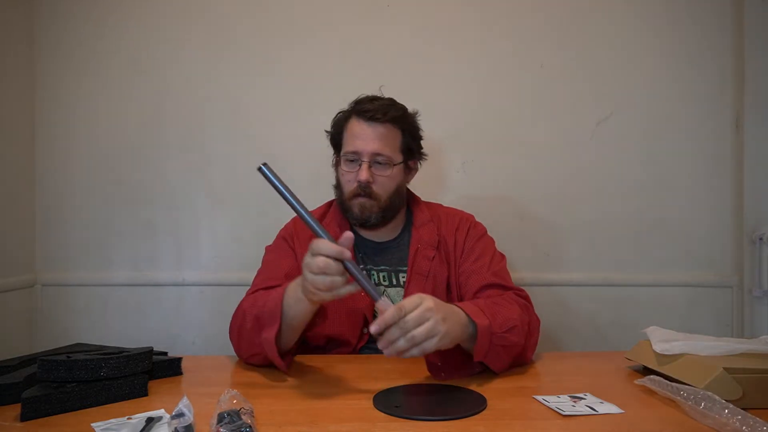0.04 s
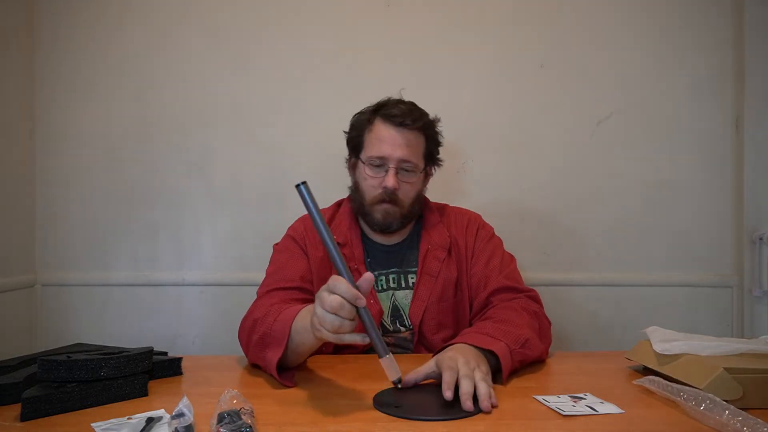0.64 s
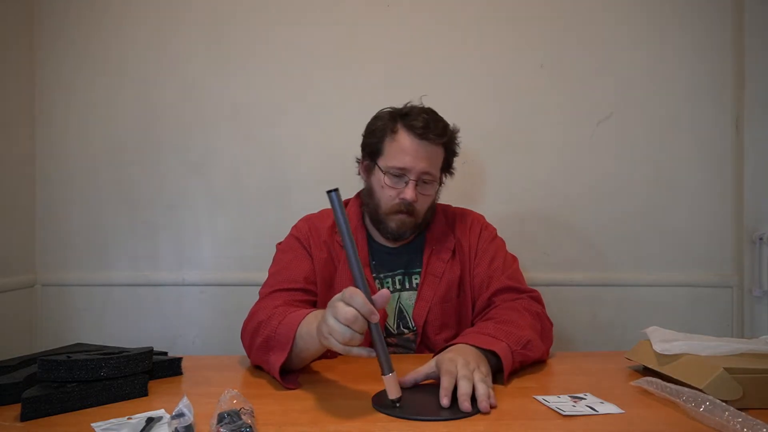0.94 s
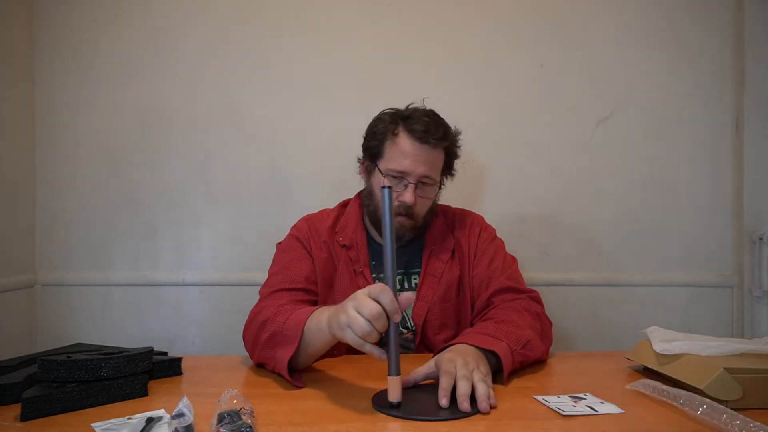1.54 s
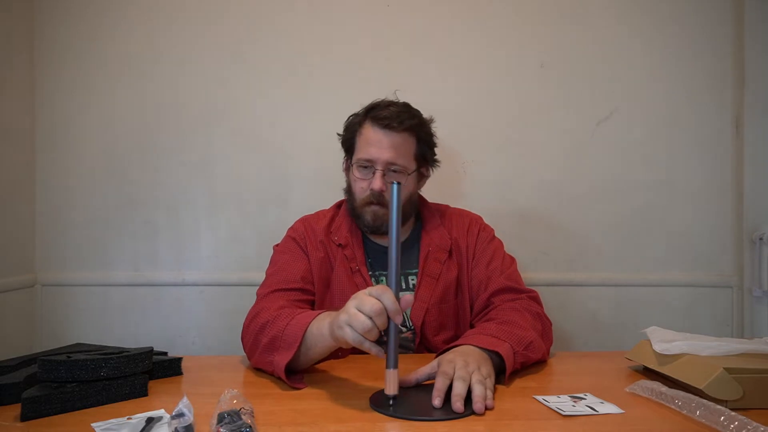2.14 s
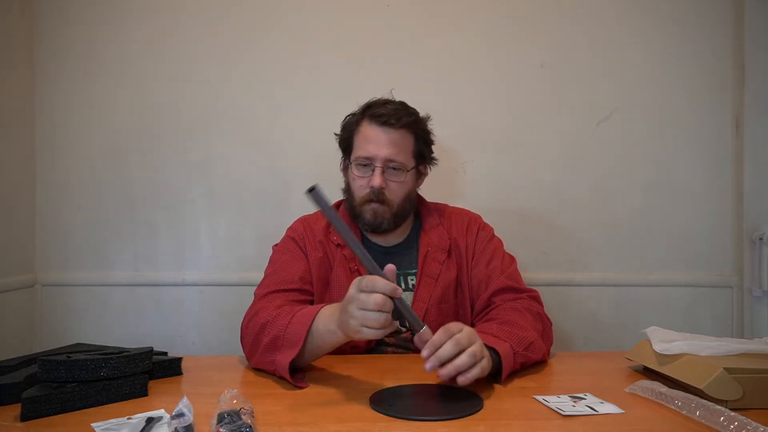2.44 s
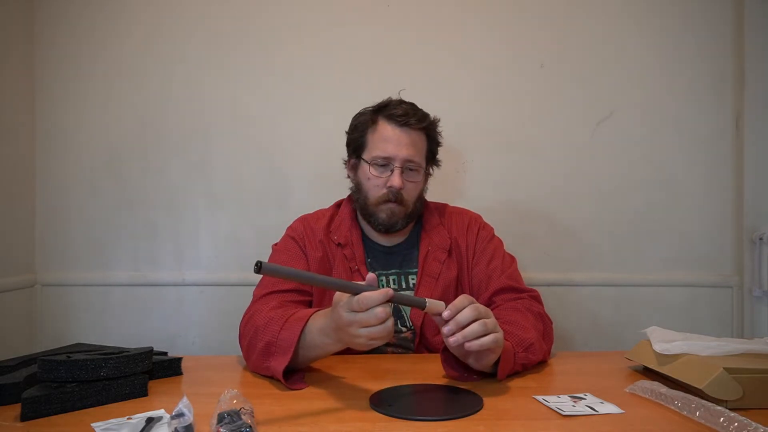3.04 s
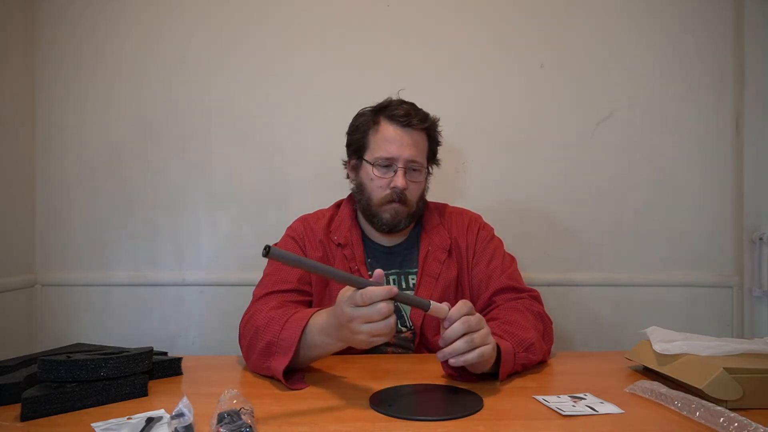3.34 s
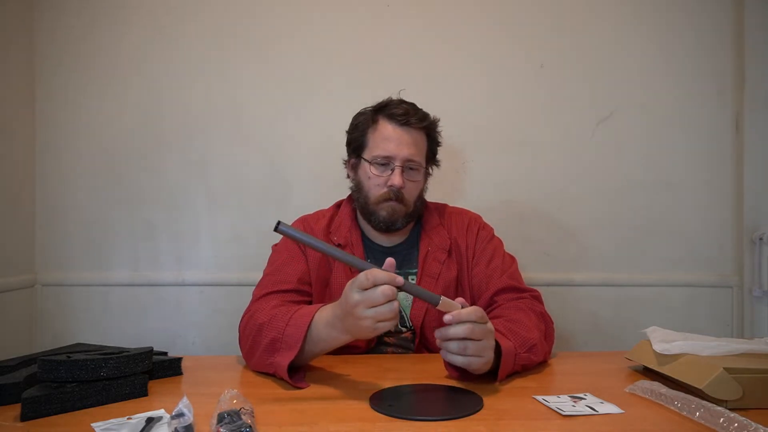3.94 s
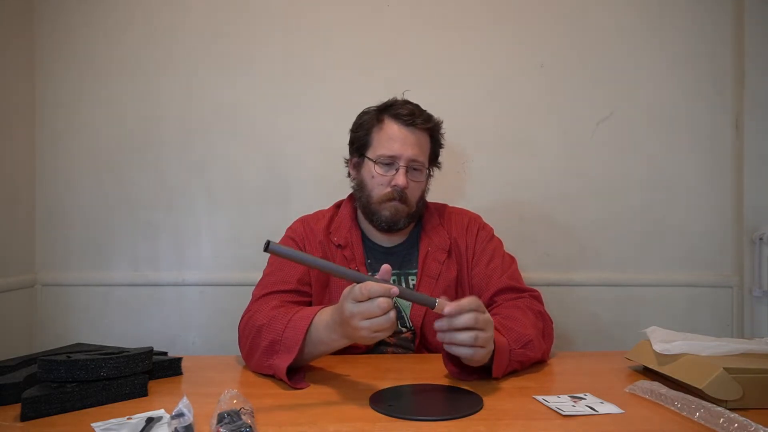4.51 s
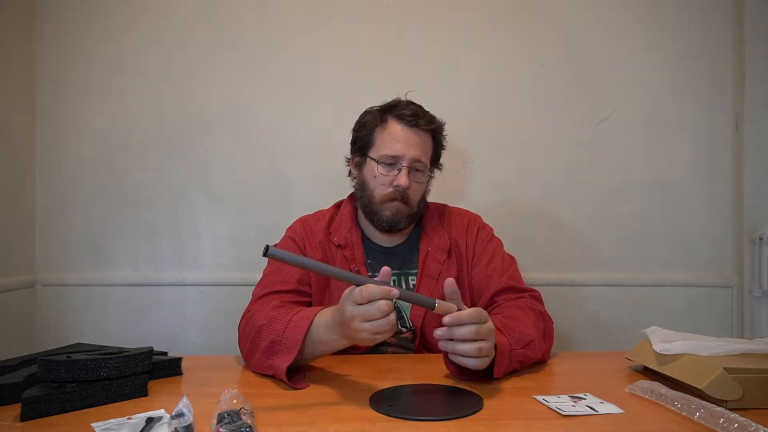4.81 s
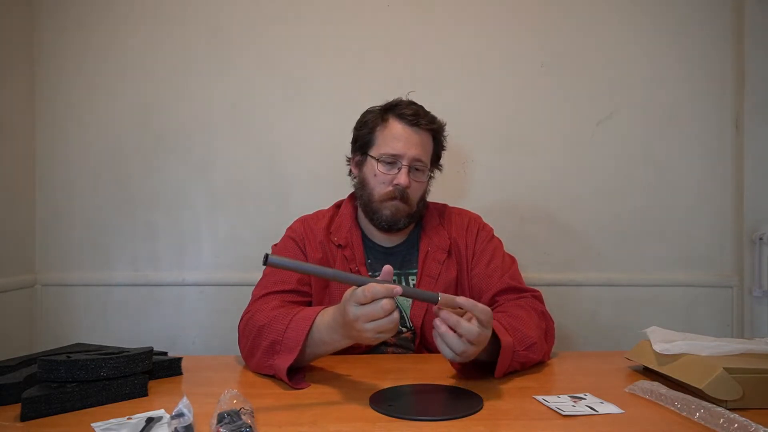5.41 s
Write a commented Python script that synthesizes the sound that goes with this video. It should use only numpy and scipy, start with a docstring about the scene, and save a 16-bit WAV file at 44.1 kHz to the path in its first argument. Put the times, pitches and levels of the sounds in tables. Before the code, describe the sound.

A metal pole knocks on its round base on a wooden table, then a fitting is twisted, scraped and clinked in the tube.

```python
"""A steel stand pole is tried on its round base on a wooden table, in a small bare room.
Its knocks excite the modes of the base, which booms through the table top. A fitting in the
pole's end is rubbed, twisted and clinked against the hand-held tube: impact and friction
drive the same damped resonances. Palms and sleeves brush, fingers tick, and the room hums low."""
import sys
import numpy as np
from scipy import signal
from scipy.fft import rfft, irfft, next_fast_len
from scipy.io import wavfile
from scipy.ndimage import map_coordinates

SR = 44100
rng = np.random.default_rng(int(sys.argv[2]) if len(sys.argv) > 2 else 0)


def wrap_up_sound(samples):
    """Save the sound to the file named by the first command line argument, as 16-bit audio."""
    columns = np.atleast_2d(samples).T
    # keep every value between -1 and 1, then stretch to whole-number steps
    tamed = np.clip(columns, -1, 1)
    steps = np.round(tamed * 32767).astype(np.int16)
    wavfile.write(sys.argv[1], SR, steps)


N = 245632

# modes of the hand-damped steel tube: f/Hz, level/dB, T60/s
TUBE_MODES = [(1980, -28, 0.13), (2963, -8, 0.079), (3185, -16.5, 0.16), (3375, -18.5, 0.16),
              (4155, -11, 0.18), (4340, -5, 0.044), (4680, -13.5, 0.036), (5350, -13.5, 0.19),
              (5540, -3, 0.089), (5586, -13, 0.25), (6900, -11, 0.026), (7550, -14.5, 0.081),
              (8640, -10.5, 0.061), (8420, -8.5, .05), (9910, -8.5, 0.023), (10900, -9.5, .065),
              (10870, -10.5, .17), (11300, -7, .045), (13120, -17, 0.13), (13300, -12, 0.031),
              (15200, -15, .09)]


def amp(db):
    """Amplitude ratio of a level in decibels."""
    return 10 ** (np.asarray(db) / 20)


def unit(x):
    """Normalisation to rms 1."""
    return x / np.sqrt(np.mean(x ** 2) + 1e-20)


def along(points, hz):
    """Interpolation of (f/Hz, value) points on a logarithmic frequency axis."""
    f, v = np.transpose(points)
    return np.interp(np.log(hz + 1), np.log(f + 1), v)


def wobble(rate):
    """Smooth random modulation: a spline through rate knots a second."""
    return map_coordinates(rng.standard_normal(int(N * rate / SR) + 4), [np.arange(N) * rate / SR])


def filtered(x, response):
    """Linear filtering: the spectrum of x times a frequency response."""
    n = x.shape[-1]
    m = next_fast_len(n + 4096)
    return irfft(rfft(x, m) * response(np.fft.rfftfreq(m, 1 / SR)), m)[..., :n]


def noise(spectrum, shape):
    """Gaussian noise of rms 1, coloured by (f/Hz, level/dB) points."""
    return unit(filtered(rng.standard_normal(shape), lambda hz: amp(along(spectrum, hz))))


def spread(pair, side_db):
    """Sum and difference of two unrelated signals give partly coherent left and right channels."""
    side = amp(side_db) * pair[1]
    return np.array([pair[0] + side, pair[0] - side]) / np.hypot(1, amp(side_db))


def add(track, s, sound):
    """Superposition of a sound on the track, starting at s seconds."""
    start = max(round(s * SR), 0)
    part = track[..., start:start + sound.shape[-1]]
    part += sound[..., :part.shape[-1]]


def swells(rows, rest_db, attack_s, release_s, sag_db_per_s=0):
    """Envelope of gestures added in power to a resting level; attack and release span 60 dB."""
    start, length, db = np.transpose(rows)[..., None]
    t = np.arange(N) / SR - start
    level = db - 60 * np.maximum(-t, 0) / attack_s - sag_db_per_s * np.clip(t, 0, length)
    level -= 60 * np.maximum(t - length, 0) / release_s
    return np.sqrt(amp(rest_db) ** 2 + np.sum(amp(np.maximum(level, -200)) ** 2, axis=0))


def ring(modes, t, scatter_db, detune):
    """Free vibration: damped modes of alternating sign, perturbed by the grip at each blow."""
    hz, db, t60 = np.transpose(modes)[..., None]
    level = db + scatter_db * rng.standard_normal(db.shape)
    hz = hz * (1 + detune * rng.standard_normal(db.shape))
    sign = (-1) ** np.arange(len(modes))[:, None]
    return np.sum(sign * amp(level - 60 * t / t60) * np.sin(2 * np.pi * hz * t), axis=0)


def in_room(x, wet_db, early_db=-11, early_t60=0.067, side_db=-2):
    """Reverberation: direct sound, early reflections from table and wall, and a diffuse tail."""
    # reverberation time of the room: f/Hz, T60/s
    walls = [(100, 0.45), (300, 0.41), (1000, 0.43), (3000, 0.44), (7000, 0.3), (15000, 0.19)]
    hz, t, z = signal.stft(rng.standard_normal((2, SR // 2)), SR, nperseg=256)
    tail = signal.istft(z * amp(-60 * t / along(walls, hz)[:, None]), SR, nperseg=256)[1]
    t = np.arange(tail.shape[1]) / SR
    tail *= 1 - np.exp(-t / 0.0043)
    early = rng.standard_normal(tail.shape) ** 3 * amp(-60 * t / early_t60) * (1 - np.exp(-t / 0.012))
    response = spread(amp(wet_db) * unit(tail) + amp(early_db) * unit(early), side_db) / np.sqrt(len(t))
    return x + signal.fftconvolve(x[None], response, axes=1)[:, :len(x)]


def room_tone():
    """Background noise: still air and rumble under low tones modulated in amplitude and phase."""
    # spectrum of still air: f/Hz, level/dB
    air_spectrum = [(12, -29), (20, -5.5), (65, 0), (138, -4), (222, -2), (377, -7.5), (430, -11),
                    (560, -14.5), (1100, -21), (2000, -33), (4700, -38), (7500, -34), (16000, -46.5)]
    # partials of the hum: f/Hz, level/dB
    partials = [(210, -68), (296, -70.5), (415, -70.5)]
    # swells of the drone and of the rumble: t/s, duration/s, level/dB
    drone_swells = [(0, 0.071, -59.5), (3.34, 0.3, -55.5), (4.08, 0.16, -61.5)]
    rumble_swells = [(0, .03, -54), (.24, 0.063, -56.5), (4.91, 0.079, -53), (5.15, 0.27, -57.5)]
    rumble_spectrum = [(10, -15), (25, 3), (45, -3), (70, -19.5), (200, -63.5), (1000, -120)]
    t = np.arange(N) / SR
    tone = lambda hz, waver: np.sqrt(2) * np.sin(2 * np.pi * hz * t + waver * wobble(6.1))
    slow_swells = lambda rows, rest_db: swells(rows, rest_db, attack_s=0.26, release_s=0.56)
    hum = sum(amp(db + 1.9 * wobble(4.4)) * tone(hz, waver=0.77) for hz, db in partials)
    drone = slow_swells(drone_swells, rest_db=-65) * amp(1.6 * wobble(5)) * tone(hz=87, waver=0.87)
    rumble = slow_swells(rumble_swells, rest_db=-62) * spread(noise(rumble_spectrum, (2, N)), -2.5)
    air = amp(-57.5) * spread(noise(air_spectrum, (2, N)), side_db=-2.5)
    return air + hum + drone + rumble


def sliding_palm(log_width=0.48, skirt_db=-9):
    """Friction noise of a palm on the pole: the band falls in frequency as the hand slows."""
    # course of the slide: t/s, relative level/dB, centre f/Hz
    slide = [(0, -64.5, 4800), (.1, -77, 4200), (.18, -60, 3100), (.26, -57, 2400), (.34, -63.5, 2100),
             (.45, -87, 2000), (.7, -95, 2000)]
    times, db, centre = np.transpose(slide)
    hz, t, z = signal.stft(rng.standard_normal(N), SR, nperseg=256)
    offset = np.log((hz[:, None] + 1) / np.interp(t, times, centre))
    band = np.exp(-(offset / log_width) ** 2) + amp(skirt_db - 3.6 * np.abs(offset))
    hiss = signal.istft(z * band, SR, nperseg=256)[1][:N]
    level = np.interp(np.arange(N) / SR, times, db)
    return in_room(amp(level - 2) * unit(hiss), wet_db=-8)


def fitting_db(hz):
    """Resonance of the short steel fitting: broad Lorentzian peaks, as a boost in dB."""
    # resonances: f/Hz, width/Hz, boost/dB
    peaks = [(4400, 250, 3), (5544, 410, 6.5), (6670, 410, 5), (7620, 130, 9), (8640, 290, 9.5),
             (10000, 220, 7.5), (11100, 180, 7.5), (11600, 210, 3), (13030, 280, 5.5)]
    return sum(db / (1 + (2 * (hz - centre) / width) ** 2) for centre, width, db in peaks)


def clinks(graze_s=.003, graze_db=-15, spot_db=6.5, spot_log_width=0.079):
    """Impact excitation: steel grazes, catches and chatters, leaving the tube in free vibration."""
    # impacts, in relative levels: t/s, level/dB, body/dB, sparkle/dB, favoured f/Hz, tube ring/dB
    impacts = [(0.0705, -27, -11.5, -19, 5400, 4), (1.1208, -29, -1.5, -12, 5430, 7),
               (1.1499, -20, -5.5, -12.5, 5480, -1.5), (1.226, -23.5, -2, -30, 1600, 0),
               (1.701, -35, 0.5, -16, 5450, 1.5), (2.3672, -17, -21, -10, 6940, -12),
               (2.3714, -22.5, -16, -10.5, 4400, -3.5), (2.4115, -15, -19.5, -10.5, 7090, -11),
               (2.5666, -36.5, -15.5, -18, 4900, -8.5), (2.6002, -13, -24, -11, 8650, -2),
               (2.7988, -38.5, -4.5, -9, 2400, -10), (3.1476, -41.5, -15, -24, 4200, 3),
               (3.2041, -29, -16.5, -10, 8800, -8), (3.8445, -36.5, -11, -18.5, 4880, -1),
               (3.9101, -37, -11, -15, 5300, -2), (3.926, -37.5, -10.5, -22, 5140, -2),
               (4.0927, -26, -17, -21.5, 3430, 5.5), (4.2294, -35, -16, -18, 3400, 2.5),
               (4.2348, -31.5, -13, -24, 4200, -0.5), (4.3849, -32, -15.5, -29, 4400, -2),
               (4.3879, -22, -21, -22, 4500, 1.5), (4.4549, -9.5, -25.5, -10, 7560, -5.5),
               (4.5151, -17, -26, -9, 6730, -3), (4.539, -26.5, -14, -18.5, 4200, 0),
               (4.8293, -19, -20, -15, 4480, -5), (4.8422, -19, -15.5, -19, 5350, 7),
               (4.8477, -12, -18.5, -16.5, 5510, 0.5), (4.8722, -14.5, -29, -5.5, 4170, 2),
               (5.228, -35.5, -12, -13, 3420, 1), (5.2535, -19.5, -24, -17, 5840, -11),
               (5.2588, -18.5, -19.5, -12, 4260, -4)]
    # spectrum of the contact noise: f/Hz, level/dB
    contact_spectrum = [(150, -41.5), (500, -23), (900, -13), (2200, -7.5), (3000, 3.5), (5500, -0.5),
                        (8500, -3.5), (9400, -9), (12000, -3), (13200, -9), (14000, -20), (15200, -10.5),
                        (16000, -23)]
    loose_to_firm_db = [-19, -2]  # a firm grip gives more body, shorter chatter, shallower resonances
    out, t = np.zeros((2, N)), np.arange(SR // 2) / SR
    after = np.maximum(t - graze_s, 0)
    attack = np.maximum(amp(graze_db) * np.minimum(t / graze_s, 1), 1 - np.exp(-after / 0.00031))
    for s, db, body_db, sparkle_db, spot_hz, ring_db in impacts:
        chatter_t60 = np.interp(body_db, loose_to_firm_db, [.025, .014])
        depth = np.interp(body_db, loose_to_firm_db, [1.4, .32])
        chatter = filtered(noise(contact_spectrum, len(t)), lambda hz: amp(depth * fitting_db(hz)))
        seating = amp(-60 * np.minimum(after / chatter_t60, 3) ** 1.39)  # holds, then the parts seat
        tube = amp(ring_db - 11) * ring(TUBE_MODES, after, scatter_db=1.5, detune=0.0011)
        hit = (unit(chatter) * seating + tube) * attack
        colour = [(2000, body_db + 16.5), (4200, 0.0025), (8000, 0.0028), (11500, sparkle_db + 13.5)]
        # the struck spot favours some modes
        spot = lambda hz: spot_db * np.exp(-(np.log((hz + 1) / spot_hz) / spot_log_width) ** 2)
        hit = filtered(hit, lambda hz: amp(along(colour, hz) + spot(hz)))
        hit /= np.std(hit[:SR // 140])  # the first 7 ms set the level
        add(out, s - graze_s, in_room(amp(db - 11.5) * hit, wet_db=-5.5))
    return out


def rubbing(grit_db=6, ring_db=6, width_hz=45):
    """Stick-slip friction: rough steel drives the tube, whose least damped modes build up most."""
    # strokes of the fitting in the tube: t/s, duration/s, relative level/dB
    strokes = [(.072, 0.0064, -39), (1.78, 0.055, -65.5), (3.42, .26, -73), (3.935, 0.32, -53),
               (4.06, .025, -49), (4.092, .03, -44.5), (4.205, .035, -46), (4.46, 0.03, -34.5),
               (4.53, 0.16, -44.5), (4.85, 0.063, -34), (5.262, 0.011, -34.5), (5.34, .015, -50)]
    colour = [(300, -28), (1200, -9), (2000, -8.5), (3300, 0.5), (4200, -5), (5500, -10),
              (9000, -14), (12000, -11), (15000, -15), (16000, -24)]  # f/Hz, level/dB
    slips = rng.standard_normal(N) * unit(amp(grit_db * wobble(500) + 2.8 * wobble(60)))
    contact = lambda f: amp(along(colour, f) + fitting_db(f))
    tube = lambda f: sum(t60 / 0.11 * 1j * f * width_hz / (hz * hz - f * f + 1j * f * width_hz)
                         for hz, _, t60 in TUBE_MODES)
    scrape = filtered(slips, lambda f: contact(f) * (1 + amp(ring_db) * tube(f)))
    # the fitting never lies quite still
    envelope = swells(strokes, rest_db=-82.5, attack_s=0.033, release_s=0.19, sag_db_per_s=33.5)
    return in_room(amp(-5.5) * envelope * unit(scrape), wet_db=-5.5)


def sleeves():
    """Soft friction: cloth and skin give fluctuating broadband noise as the arms move."""
    # arm movements: t/s, duration/s, relative level/dB
    movements = [(.15, 0.1, -56.5), (.44, 0.24, -64.5), (2.3, .42, -68.5), (3.7, 0.05, -70)]
    # spectrum of brushing cloth: f/Hz, level/dB
    cloth_spectrum = [(150, -16.5), (400, -1), (1200, -0.5), (2600, -3), (5000, -8), (10000, -13.5),
                      (16000, -16)]
    brush = unit(noise(cloth_spectrum, N) * amp(4.4 * wobble(60)))
    envelope = swells(movements, rest_db=-71, attack_s=.5, release_s=0.71)
    return in_room(amp(-4) * envelope * brush, wet_db=-3.5)


def knocks(settle_s=0.0398, settled_db=-7):
    """Structure-borne sound: the struck base shudders and settles; the table's lowest mode booms on."""
    # blows on the base: t/s, level/dB, cut-off f/Hz, relative boom/dB
    blows = [(.238, -54, 1700, -5), (.381, -49, 1400, -9), (0.9537, -30, 1280, -6.5),
             (1.144, -28, 1830, -12), (1.2241, -25, 2150, -9.5), (1.614, -36, 395, -15),
             (1.698, -47, 680, -12.5), (1.757, -47, 380, -14.5)]
    # modes of the base on the table, the table's own first: f/Hz, level/dB, T60/s
    modes = [(130.2, 0, 1), (177.5, -6.5, 0.177), (223.5, -9.5, 0.16), (319.4, -2, 0.25),
             (356.2, -4.5, 0.43), (406.6, -15.5, 0.56), (483.4, -11, 0.18), (575, -4, 0.12),
             (592, -7.5, 0.22), (683, -11, 0.2), (846, -6.5, 0.18), (900, -6.5, 0.16), (1020, -16, 0.17),
             (1205, -12, 0.2), (1290, -9.5, 0.1), (1348, -9.5, 0.13), (1635, -28, 0.1), (1810, -28, 0.078)]
    # spectrum of the contact noise: f/Hz, level/dB
    thud_spectrum = [(60, -27), (170, -18), (350, 7.5), (900, 9.5), (1400, -0.5), (2200, -8.5),
                     (5000, -5.5)]
    out, t = np.zeros((2, N)), np.arange(SR) / SR
    shudder = amp(np.interp(t, [0, settle_s, settle_s + 0.0042], [-2, 2, settled_db]))
    table_hz, table_db, table_t60 = modes[0]
    boom = amp(table_db - 60 * t / table_t60) * np.sin(2 * np.pi * table_hz * t)
    boom *= 1 - np.exp(-t / 0.0074)
    for s, db, cutoff_hz, boom_db in blows:
        plate = ring(modes[1:], t, scatter_db=0, detune=0.0029)
        thud = amp(5 - 60 * t / 0.07) * noise(thud_spectrum, len(t))
        blow = (plate + thud) * shudder * (1 - np.exp(-t / 0.00071))
        softness = signal.butter(2, cutoff_hz, fs=SR, output="sos")  # a softer contact is duller
        knock = amp(db) * signal.sosfilt(softness, blow)
        add(out, s, in_room(knock, wet_db=-8, early_db=-11.5, side_db=-3.5))
        add(out, s, amp(db + boom_db) * boom)
    return out


def ticks(faint_count=14, faint_db=-58, scatter_db=3, t60=0.0096):
    """Contact transients: light touches give brief noise bursts without ringing the tube."""
    # clearest touches of fingers and fitting: t/s, relative level/dB, centre f/Hz
    touches = [(.645, -46, 12000), (.819, -45.5, 7500), (.994, -42, 4900), (1.448, -44.5, 5170),
               (1.987, -53, 4500), (2.058, -52, 8000), (2.32, -45.5, 6040), (2.464, -34, 3960),
               (2.823, -40, 4350), (3.497, -44, 4050), (3.525, -43.5, 1520), (3.736, -45.5, 3500),
               (3.98, -41.5, 5530), (4.2, -42, 4200), (5.546, -42.5, 5920)]
    out, t = np.zeros(N), np.arange(SR // 20) / SR
    faint = [(rng.uniform(0.44, 3.2), faint_db + rng.uniform(-scatter_db, scatter_db), 7500)
             for _ in range(faint_count)]
    for s, db, hz in list(touches) + faint:
        snap = noise([(hz / 8, -18), (hz / 2, -2), (hz, 0), (hz * 2, -9)], len(t))
        add(out, s, amp(db - 5 - 60 * t / t60) * snap)
    return in_room(out, wet_db=-3)


def scene():
    """Phase difference places the work just right of centre: the left side hears it slightly later."""
    metal = (clinks() + ticks() + rubbing()) * amp([[.2], [-.2]])
    work = metal + knocks() * amp([[-.3], [.3]]) + sleeves() + sliding_palm()
    lag = [(100, 0.069), (500, 0.32), (1200, 0.15), (2500, 0.35),
           (4500, 0.72), (8000, 0.9), (13000, 1.0)]  # f/Hz, phase/rad
    return filtered(work, lambda hz: np.exp(.5j * along(lag, hz) * np.array([[-1], [1]]))) + room_tone()


def record(dry):
    """Band limiting: a low-pass edge 200 Hz wide, centred on 15.9 kHz."""
    return filtered(dry, lambda hz: np.clip((15900 - hz) / 200 + .5, 0, 1))


dry = scene()
out = record(dry)
wrap_up_sound(out)
```